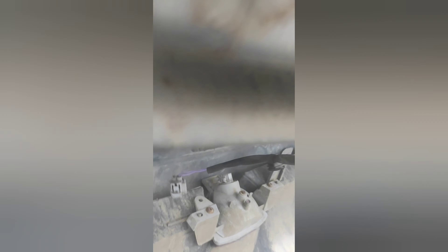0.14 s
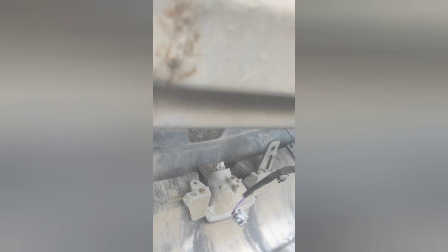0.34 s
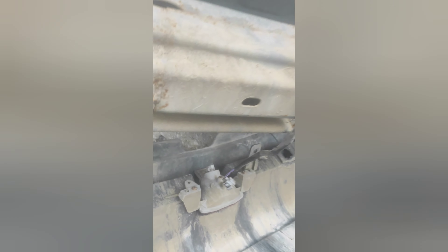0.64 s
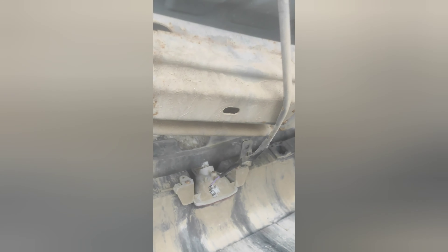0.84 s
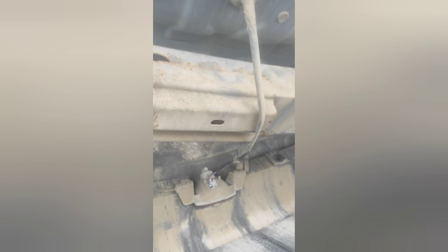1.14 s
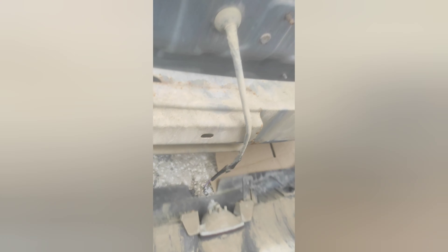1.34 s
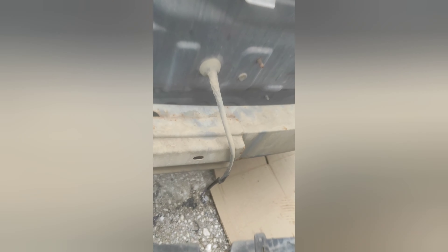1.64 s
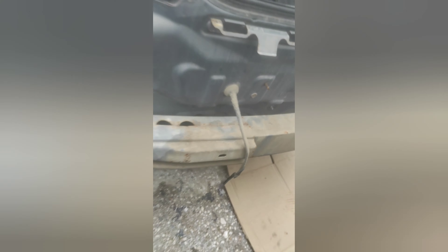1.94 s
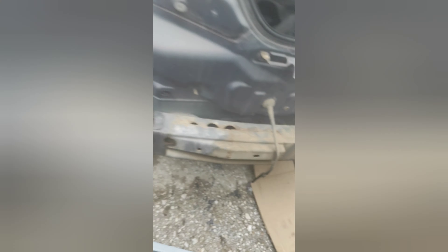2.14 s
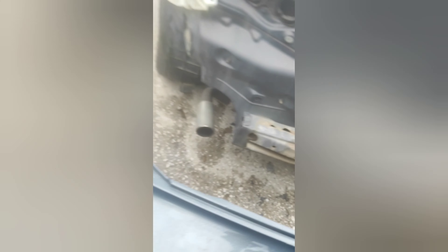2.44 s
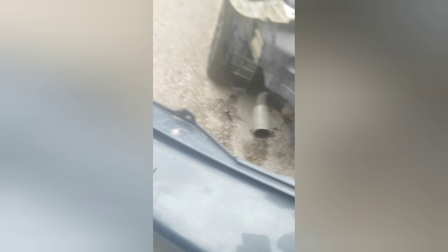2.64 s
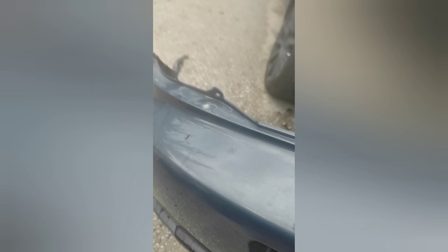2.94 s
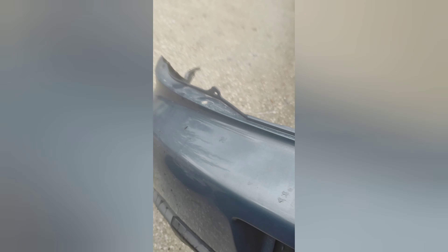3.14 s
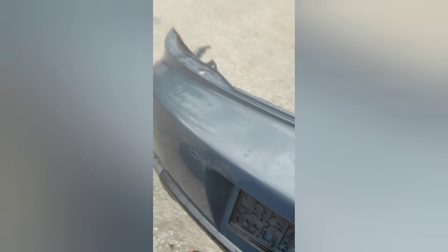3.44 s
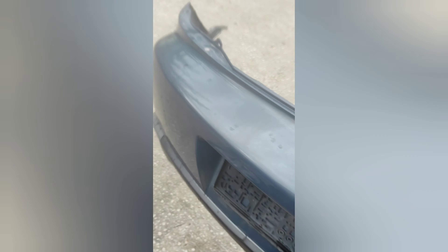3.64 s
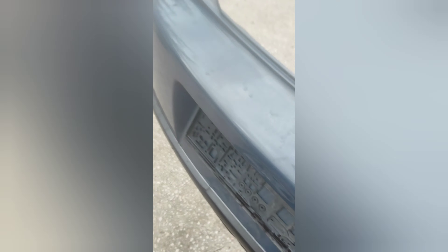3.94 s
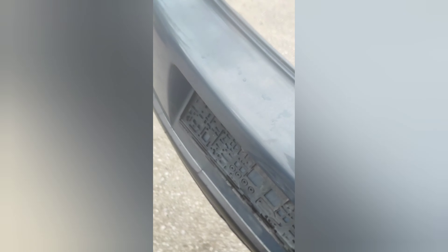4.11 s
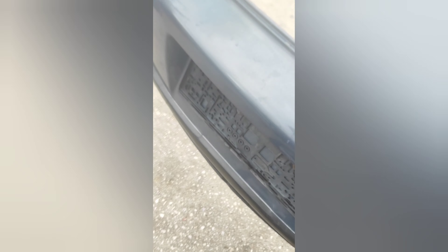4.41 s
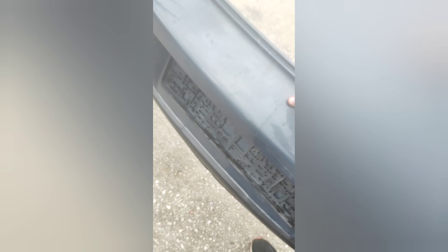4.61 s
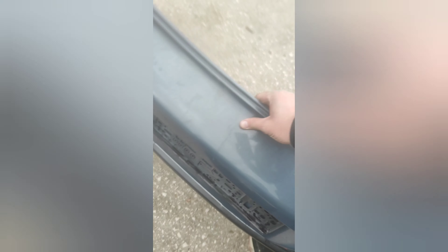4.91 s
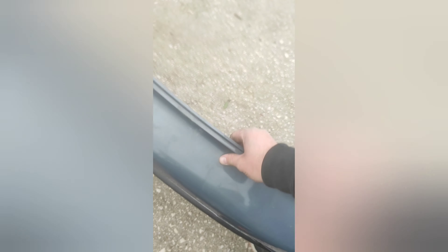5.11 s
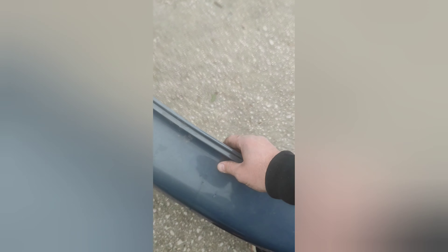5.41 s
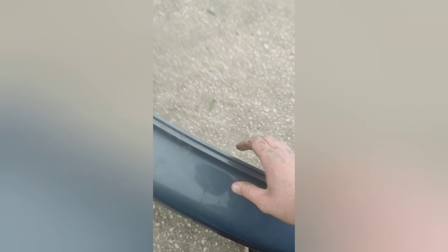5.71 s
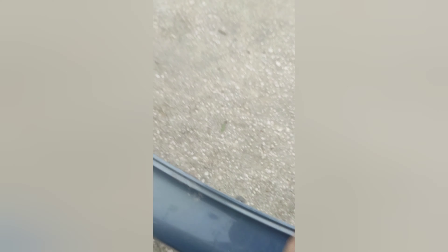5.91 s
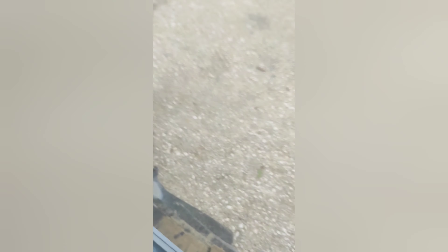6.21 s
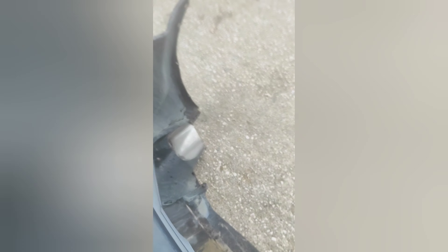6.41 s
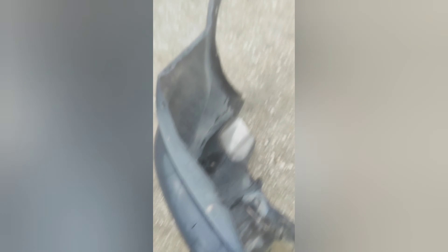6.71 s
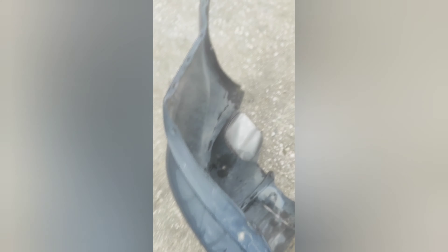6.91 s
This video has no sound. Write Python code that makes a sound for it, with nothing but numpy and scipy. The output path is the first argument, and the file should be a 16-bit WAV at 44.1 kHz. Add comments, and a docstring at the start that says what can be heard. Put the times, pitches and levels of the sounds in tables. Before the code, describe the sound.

Hollow plastic knocks, clip cracks and juddering scrapes come in a dense burst, then sparser thuds and rattles outdoors, with cloth rustling close by.

```python
"""A loose plastic bumper cover is worked off a car over a quiet, low-rumbling yard, a jacket rustling close by.
First, up to 2.3 s, clips snap, struck shell modes thud, and slip trains scrape and judder along the body. Then
it is carried a few steps, with small hollow taps, and gripped again: thuds at 3.5 s, rattles from 4.7 s. Cloth
is shaped noise that swells with each arm swing; the yard is shaped noise whose rumble slowly rises and sinks,
the air wavering a little. At the end a faint far-off whir, a narrow wavering noise band, rises at 6.1 s."""
import sys
import numpy as np
from scipy import signal
from scipy.fft import rfft, irfft, next_fast_len
from scipy.io import wavfile
from scipy.ndimage import uniform_filter1d

SR = 44100
rng = np.random.default_rng(int(sys.argv[2]) if len(sys.argv) > 2 else 0)


def to_wav(sig):
    """Store sig (one row per channel, or 1-D mono) as 16-bit WAV at the path in sys.argv[1].

    Samples outside -1..1 are clipped; the rate is SR.
    """
    pcm = np.clip(np.atleast_2d(sig), -1, 1) * 32767
    pcm = np.round(pcm).astype(np.int16)
    wavfile.write(sys.argv[1], SR, pcm.T)  # frames by channels


N = 311346

# Levels in the event tables are before each function's trims; spectra and modes are relative.
# Yard rumble level. Each row: time in seconds, level in dB.
YARD_LEVEL_DB = [(0, -44), (2.3, -45.5), (2.7, -53), (3.6, -44), (4.3, -48.5), (4.8, -45), (6.2, -48.5),
                 (7.06, -42.5)]
# Rumble spectrum. Each row: frequency in Hz, density in dB per Hz.
RUMBLE_SPECTRUM_DB = [(12, -22), (30, 7.5), (37, -6.5), (45, 14), (58, -2.5), (80, -2), (110, -9.5),
                      (200, -57)]
# Open-air spectrum. Each row: frequency in Hz, density in dB per Hz.
AIR_SPECTRUM_DB = [(60, -35), (120, 5), (210, 5), (400, -2.5), (750, -6), (1050, -1), (1500, -8.5),
                   (2200, -9), (4000, -31)]
# Far-off whir. Each row: time in seconds, centre in Hz, level in dB.
WHIR_TRACK = [(6.1, 1395, -76), (6.27, 1390, -56), (6.68, 1480, -52), (7.06, 1470, -58)]
# Arm swings sliding the jacket cloth. Each row: fastest slide in seconds, length in seconds, level in dB.
ARM_SWINGS = [(0.142, 0.57, -45), (0.612, 0.54, -40.5), (1.31, 0.75, -37), (1.953, 0.78, -43),
              (2.412, 0.79, -42), (2.734, 0.18, -45), (3.529, 0.7, -47.5), (3.885, 0.26, -42.5),
              (4.08, 0.42, -49.5), (4.555, 0.7, -48.5), (5.134, 0.31, -42), (5.442, 0.13, -49.5),
              (5.804, 0.51, -47.5), (6.218, 0.44, -47.5), (6.59, 1, -52.5), (6.95, 0.28, -44)]
# Cloth spectrum. Each row: frequency in Hz, density in dB per Hz.
CLOTH_SPECTRUM_DB = [(120, -33), (200, 0), (227, -5.5), (288, -1.5), (422, -5), (555, -5.5), (1050, -8.5),
                     (1660, -10.5), (3250, -12), (3630, -17), (7390, -5.5), (8240, -7), (10100, -27),
                     (15600, -34)]
# Small hollow taps during the carry. Each row: start in seconds, level in dB, centre in Hz.
TAP_EVENTS = [(2.133, -41.5, 700), (4.336, -47, 980), (4.455, -36.5, 890), (4.475, -40.5, 1050),
              (5.533, -43, 550), (5.849, -34.5, 680), (6.922, -35.5, 950)]
# Drags over the car body. Each row: hardest bearing in seconds, build-up in seconds, let-go in seconds,
# shell level in dB, panel level in dB, rasp level in dB.
DRAG_EVENTS = [(0.018, 0.26, 0.18, -32, -38.5, -38), (0.546, 0.087, 0.1, -28, -25.5, -29.5),
               (0.668, 0.032, 0.034, -24.5, -24.5, -52), (0.745, 0.072, 0.21, -33.5, -31, -31.5),
               (0.91, 0.065, 0.078, -31, -34.5, -39), (1.06, 0.14, 0.084, -31, -31, -34.5),
               (1.175, 0.11, 0.14, -31, -25.5, -35), (1.255, 0.16, 0.32, -25, -26.5, -22),
               (1.345, 0.13, 0.12, -36, -18, -16), (1.413, 0.068, 0.069, -21.5, -19, -25),
               (1.49, 0.15, 0.23, -27, -25.5, -27.5), (1.59, 0.73, 0.13, -26, -34, -33),
               (1.871, 0.21, 0.12, -34.5, -38.5, -38), (3.575, 0.15, 0.14, -29.5, -34, -32.5),
               (3.705, 0.086, 0.17, -37, -42.5, -41), (4.775, 0.076, 0.043, -32.5, -38, -32.5),
               (4.87, 0.086, 0.2, -28, -33.5, -35.5), (5.061, 0.0099, 0.068, -25, -30, -22.5),
               (5.12, 0.13, 0.18, -39.5, -38.5, -37.5), (5.35, 0.076, 0.072, -45.5, -46.5, -48.5),
               (5.48, 0.079, 0.14, -40, -46.5, -56), (6.945, 0.032, 0.11, -53, -39.5, -44)]
# Steady stick-slip of the edge. Each row: start in seconds, end in seconds, slips per second,
# level in dB, roughness from 0 to 1.
JUDDER_EVENTS = [(0.497, 0.585, 416, -20, 0.53), (1.536, 1.58, 239, -11, 0), (2.003, 2.036, 427, -31, 0),
                 (5.053, 5.089, 243, -15.5, 0.2)]
# Blows. Each row: start in seconds, panel knock in dB, shell thud in dB, clip crack in dB,
# frequency in Hz at which the shell flexes most.
BLOW_EVENTS = [(0.128, -24, -20, -35.5, 235), (0.141, -34, -24, -48, 193), (0.159, -43, -22, -59, 146),
               (0.199, -19, -17, -14, 362), (0.615, -38, -17.5, -42, 268), (0.628, -19, -22, -56, 370),
               (0.712, -24.5, -27.5, -55, 366), (0.782, -22, -13.5, -33.5, 330),
               (0.792, -33, -13.5, -32, 230), (0.806, -35.5, -21, -55, 200), (0.853, -56, -24.5, -63, 257),
               (0.872, -24.5, -28, -35, 222), (0.968, -25, -40, -40, 453), (1.012, -30, -18, -35.5, 226),
               (1.096, -16, -15.5, -26.5, 287), (1.238, -38, -19, -29.5, 242),
               (1.332, -17, -13, -40.5, 256), (1.348, -29, -15.5, -20, 494), (1.362, -13.5, -22, -32, 440),
               (1.376, -20.5, -15, -41, 266), (1.438, -43, -26.5, -53, 242), (1.483, -39, -37, -28, 248),
               (1.548, -17, -13, -39, 248), (1.579, -24, -20.5, -38, 480), (1.784, -40, -23, -38, 226),
               (1.797, -28, -16.5, -29.5, 265), (1.857, -50, -27, -58, 218), (2.005, -39, -27.5, -50, 270),
               (2.265, -27.5, -38.5, -36, 403), (2.299, -32, -36.5, -52.5, 344),
               (2.739, -44, -36, -60, 272), (3.463, -38, -30, -55, 152), (3.521, -47, -20, -63, 151),
               (3.5501, -18.5, -10.5, -30.5, 300), (3.5606, -19.5, -10.5, -34, 303),
               (3.5755, -30, -10.5, -50, 274), (3.583, -41, -13, -55, 267), (3.618, -30, -20, -35, 292),
               (3.643, -32.5, -21.5, -43, 283), (3.671, -30.5, -32, -41.5, 336),
               (3.704, -34, -30, -48, 300), (3.775, -35.5, -24, -44.5, 302), (3.989, -38, -33, -47, 367),
               (4.021, -41, -32.5, -58, 283), (4.721, -22.5, -19.5, -40.5, 266),
               (4.727, -28, -16.5, -67, 396), (4.759, -34, -22, -35.5, 188), (4.82, -31.5, -31, -39, 302),
               (4.831, -27, -20, -38, 306), (4.852, -37, -22.5, -32.5, 198), (4.869, -19, -33, -26.5, 190),
               (4.9, -30, -47, -32.5, 213), (4.928, -31, -30, -48, 199), (4.965, -34, -25, -49, 230),
               (5.046, -39, -20.5, -28, 302), (5.052, -19.5, -29, -26, 253), (5.094, -33, -24, -46, 254),
               (5.117, -37, -34, -33.5, 190), (5.259, -40.5, -53, -68, 303),
               (5.435, -34.5, -36, -54.5, 280), (6.077, -42.5, -54, -45.5, 300),
               (7.028, -39, -45, -47, 246)]
# Broad flexing modes of the shell. Each row: frequency in Hz, level in dB, t60 in seconds (ungripped).
SHELL_MODES = [(103, 10.5, 0.086), (157.8, 0, 0.45), (191, 5, 0.12), (214.5, 2.5, 0.11), (244, 3, 0.1),
               (287.3, 1, 0.085), (345.8, -1, 0.093), (371.6, -2, 0.14), (417, 3.5, 0.084),
               (463, 2.5, 0.062)]
# Strongest panel modes. Each row: frequency in Hz, level in dB, t60 in seconds (before hand damping).
PANEL_STRONG_MODES = [(615, 3, 0.053), (670, 2.5, 0.036), (796.6, 2.5, 0.041), (937, 0.5, 0.029),
                      (1091, -1.5, 0.042), (1322, -4.5, 0.055), (1730, -15.5, 0.12)]
# Stiff rim that holds the clips. Each row: frequency in Hz, level in dB, t60 in seconds.
RIM_MODES = [(1483, 14.5, 0.031), (1627, 8.5, 0.045), (1910, 12.5, 0.038), (2195, 12.5, 0.042),
             (2573, 15, 0.027), (2788, 10, 0.057), (3220, -5, 0.05), (4700, -6, 0.06)]
# Dense higher modes of panel, clips and edge. Each row: frequency in Hz, level in dB.
PANEL_SPECTRUM_DB = [(350, -22.5), (480, 5), (620, -3), (800, -0.5), (1100, 2), (1400, -9.5), (1900, -10.5),
                     (3000, -104)]
CLIP_SPECTRUM_DB = [(900, -22), (1400, 2.5), (1750, -2.5), (2300, 0), (2750, -5.5), (3300, -6),
                    (4400, -12.5), (6000, -40)]
EDGE_SPECTRUM_DB = [(2500, -58), (4000, -9), (5500, -5), (7200, 1.5), (8300, -4), (9700, -21), (15000, -45)]
# Judder rasp and outdoor scatter. Each row: frequency in Hz, level in dB.
JUDDER_SPECTRUM_DB = [(200, -32), (500, -6), (950, 8), (1200, 3.5), (1600, -34.5), (3000, -39), (12000, -43)]
SCATTER_SPECTRUM_DB = [(100, 11.5), (1500, 7.5), (6000, 9.5), (15000, -51)]
# Contact softness dulls the knock. Each row: crack minus knock in dB, low-pass corner in Hz.
KNOCK_CORNER_HZ = [(-26, 1080), (-17, 520), (-21, 4000)]
# Harder snaps reach higher rim modes. Each row: crack in dB, frequency in Hz where the drive halves.
RIM_REACH_HZ = [(-25, 2200), (-13, 5100)]
# Place of the cover. Each row: time in seconds, left minus right in dB.
COVER_SIDE_DB = [(0, -1.5), (0.9, -2), (1.6, -0.5), (3.5, 0.5)]
# Likeness of the two microphone ports. Each row: frequency in Hz, left-right coherence.
PORT_COHERENCE = [(40, 1), (300, 0.77), (640, 0.24), (1400, 0.018), (3000, 0.026), (15000, 0.13)]
# Colour difference of the ports. Each row: frequency in Hz, left minus right in dB.
PORT_LEAN_DB = [(40, 6.5), (150, 6.5), (280, 4), (600, 4.5), (1300, 4), (2800, 0), (5500, -1.5),
                (7200, -0.5), (9000, 2.5), (14000, 0)]

RING_S = np.arange(8192) / SR
CUT_HZ = 15650
SLEEVE_REST_DB = -59  # cloth is never quite still
GRIP_T60_S = 0.22  # extra fade: holding hands damp the shell
DRAG_SPAN_DB, DRAG_ROUNDING = 20, 1.3  # drop at one build-up or let-go; above 1 lingers near the peak
# the edge ticks at most TOP, and fades faster than the crack below FULL
TICK_TOP_DB, TICK_SLOPE, TICK_FULL_DB = -22.5, 1.43, -24.5


def amp(db):
    """Decibels to gain."""
    return 10 ** (np.asarray(db) / 20)


def unit(x):
    """Scales to rms 1."""
    return x / np.sqrt(np.mean(x ** 2) + 1e-20)


def struck(x, size=512):
    """Scales a pair so that its channel mean has rms 1 at its loudest moment."""
    return x / np.sqrt(uniform_filter1d(x.mean(0) ** 2, size).max() + 1e-20)


def read(points, hz):
    """Reads a spectrum on a log-frequency axis."""
    f, value = np.transpose(points)
    return np.interp(np.log(hz + 1), np.log(f + 1), value)


def follow(rows, t_s):
    """Columns of a curve table at times t_s."""
    s, *columns = np.transpose(rows)
    return [np.interp(t_s, s, column) for column in columns]


def add(mix, start_s, sound):
    """Mixes a pair in at start_s."""
    part = mix[:, max(round(start_s * SR), 0):][:, :sound.shape[1]]
    part += sound[:, :part.shape[1]]


def ports(hz):
    """Random complex weights for two microphone ports with the tabled coherence."""
    a, b, c, d = rng.standard_normal((4, len(hz)))
    same = np.clip(read(PORT_COHERENCE, hz), -1, 1)
    left = a + 1j * b
    right = same * left + np.sqrt(1 - same ** 2) * (c + 1j * d)
    return np.array([left, right])


def noise(spectrum_db, size):
    """A noise pair of the given spectrum, rms 1."""
    fft_size = next_fast_len(size)
    hz = np.fft.rfftfreq(fft_size, 1 / SR)
    return unit(irfft(ports(hz) * amp(read(spectrum_db, hz)), fft_size)[:, :size])


def drift(rate_hz, size):
    """Random values of rms about 1, drawn rate_hz times a second and joined by lines."""
    at = np.arange(size) * rate_hz / SR
    return np.interp(at, np.arange(4096), rng.standard_normal(4096)) * np.sqrt(3 / 2)


def grains(per_s, spread_db, size, clump_db=6, clumps_hz=70):
    """A random train of tiny slips that come in clumps, a few of them large."""
    clumps = amp(clump_db * drift(clumps_hz, size))
    sizes = amp(spread_db * np.minimum(rng.exponential(1, size), 4))
    signs = rng.choice([-1, 1], size)
    slips = rng.random(size) < per_s / SR * clumps / clumps.mean()
    return sizes * signs * slips


def through(drive, body):
    """A force rings a body: convolution with its ring."""
    return signal.fftconvolve(drive[None], body, axes=1)[:, :len(drive)]


def dulled(x, corner_hz):
    """Third-order low-pass."""
    return signal.lfilter(*signal.butter(3, min(corner_hz, SR / 3), fs=SR), x)


def modes(table, emphasis=1., rise_s=.0004, scatter_rad=np.pi):
    """Decaying modes with scattered start phases, each a little out of step between the ports."""
    hz, db, t60_s = np.transpose(table)
    phase = scatter_rad * rng.standard_normal(len(hz)) + 0.38 * rng.standard_normal((2, len(hz)))
    rings = np.exp(2j * np.pi * hz[:, None] * RING_S) * amp(-60 * RING_S / t60_s[:, None])
    weights = emphasis * amp(db) * np.exp(1j * phase)
    return (weights @ rings).real * (1 - np.exp(-RING_S / rise_s))


def dense_ring(spectrum_db, t60_s, hold_s=0., rise_s=0.00012):
    """Countless overlapping modes, as noise, swell, are kept up by chatter for hold_s, and die."""
    fade = amp(-60 * np.maximum(RING_S - hold_s, 0) / t60_s)
    return noise(spectrum_db, len(RING_S)) * fade * (1 - np.exp(-RING_S / rise_s))


def yard(air_db=-50):
    """A low rumble and the soft wash of open air, both shaped noise."""
    rumble_db, = follow(YARD_LEVEL_DB, np.arange(N) / SR)
    waver_db = drift(25, N)
    return amp(rumble_db) * noise(RUMBLE_SPECTRUM_DB, N) + amp(air_db + waver_db) * noise(AIR_SPECTRUM_DB, N)


def whir(half_width_hz=85, waver_hz=25):
    """Low-passed noise shifted up to a wavering centre makes a narrow, distant band."""
    hz, db = follow(WHIR_TRACK, np.arange(N) / SR)
    carrier = np.exp(2j * np.pi * np.cumsum(hz + waver_hz * drift(18, N)) / SR)
    fuzz = signal.lfilter(*signal.butter(2, half_width_hz, fs=SR), ports(np.full(N, hz.mean())))
    return amp(db) * unit((fuzz * carrier).real)


def jacket(cloth_db=2, flutter_db=1.5, ends_db=15.0):
    """Cloth friction hisses with each arm swing, swelling and fading evenly, fluttering over its folds."""
    s, length_s, db = np.transpose(ARM_SWINGS)[:, :, None]
    off_peak = 2 * (np.arange(N) / SR - s) / length_s
    swings = amp(db - ends_db * np.minimum(off_peak ** 2, 20))
    level = np.sqrt((swings ** 2).sum(0) + amp(SLEEVE_REST_DB) ** 2)
    return level * amp(cloth_db + flutter_db * drift(70, N)) * noise(CLOTH_SPECTRUM_DB, N)


def surroundings(x, wet_db=-21, t60_s=0.14):
    """Faint scatter from the ground and the car: a decaying noise tail after 6 ms."""
    t_s = np.arange(SR // 2) / SR
    tail = noise(SCATTER_SPECTRUM_DB, len(t_s)) * amp(-60 * t_s / t60_s) * (t_s > .006)
    return x + amp(wet_db) * signal.fftconvolve(x, tail / np.linalg.norm(tail[0]), axes=1)[:, :N]


def taps(t60_s=0.042, skirt_db_per_octave=-15):
    """Light contacts ring one narrow, hollow band."""
    out = np.zeros((2, N))
    octaves = np.arange(-2, 3)
    for s, db, hz in TAP_EVENTS:
        spectrum_db = np.column_stack([hz * 2. ** octaves, skirt_db_per_octave * abs(octaves)])
        ring = dense_ring(spectrum_db, t60_s, rise_s=0.00068)
        add(out, s, amp(db) * struck(dulled(ring, 2 * hz)))
    return out


def shell(flex_hz, reach_octaves):
    """The contact point drives the shell modes near flex_hz most, nearly in step."""
    octaves = np.log2(np.transpose(SHELL_MODES)[0] / flex_hz)
    emphasis = 1 / (1 + (octaves / reach_octaves) ** 2)
    return modes(SHELL_MODES, emphasis, rise_s=0.0027, scatter_rad=0.71)


def panel(t60_s, hold_s=0., rise_s=0.00025, modes_db=0):
    """A few strong modes stand out of many weak ones; a hand damps both when t60_s is short."""
    hand = amp(-60 * RING_S * max(1 / t60_s - 1 / .05, 0))
    weak = struck(dense_ring(PANEL_SPECTRUM_DB, t60_s, hold_s, rise_s))
    strong = struck(modes(PANEL_STRONG_MODES, rise_s=rise_s) * hand)
    return weak + amp(modes_db) * strong


def rim(reach_hz, rise_s=0.00044):
    """The stiff rim's modes, driven ever less above reach_hz."""
    emphasis = 1 / (1 + (np.transpose(RIM_MODES)[0] / reach_hz) ** 4)
    return struck(modes(RIM_MODES, emphasis, rise_s))


def judders(jitter=0.025, kick=0.088):
    """Regular stick-slip: the shell swings at the slip rate and each release rasps the panel."""
    out = np.zeros((2, N))
    for start_s, end_s, slip_hz, db, rough in JUDDER_EVENTS:
        size = max(round((end_s - start_s) * SR), 64)
        turns = np.cumsum(slip_hz * (1 + jitter * drift(223, size))) / SR
        swing = unit(np.sin(2 * np.pi * turns))
        releases = (kick + rng.standard_normal(size)) * np.exp(-(turns % 1) / 0.061)
        rasp = unit(through(releases, dense_ring(JUDDER_SPECTRUM_DB, t60_s=0.029)))
        grip = amp(1.5 * drift(200, size)) * signal.windows.tukey(size, .65)
        add(out, start_s, amp(db) * (swing + rough * rasp) * grip)
    return out


def bearing(t_s):
    """Drive of shell, panel and rasp in dB: each drag builds up, then lets go; the strongest wins."""
    s, build_s, let_go_s, *levels_db = np.transpose(DRAG_EVENTS)[:, :, None]
    coarse_s = t_s[::64]
    off_peak = np.maximum((s - coarse_s) / build_s, (coarse_s - s) / let_go_s)
    slack_db = DRAG_SPAN_DB * np.clip(off_peak, 0, 10) ** DRAG_ROUNDING
    return [np.interp(t_s, coarse_s, (db - slack_db).max(0)) for db in levels_db]


def scrape(body, per_s, spread_db, count=3):
    """Slips at a few contact points of varying load, each ringing the body in its own way."""
    loads = [amp(4 * drift(35, N)) for _ in range(count)]
    sound = sum(through(load * grains(per_s, spread_db, N), body()) for load in loads)
    power = uniform_filter1d((sound ** 2).mean(0), size=3500)
    return sound / np.sqrt(power + 1e-20)  # the total load is steady


def drags(flex_db=1.5, panel_db=-2.0, clip_db=-9, edge_db=-17, rim_db=-3):
    """Slips over the car body shake the shell, ring the panel and rasp along the rim and edge."""
    def clip_and_rim():
        return struck(dense_ring(CLIP_SPECTRUM_DB, t60_s=0.074)) + amp(rim_db) * rim(1750)

    shell_db, mid_db, rasp_db = bearing(np.arange(N) / SR)
    sound = amp(shell_db + flex_db) * scrape(
        lambda: shell(297, reach_octaves=0.56), per_s=260, spread_db=1.0)
    sound += amp(mid_db + panel_db) * scrape(
        lambda: panel(t60_s=0.05, modes_db=3), per_s=115, spread_db=1.8)
    sound += amp(rasp_db + clip_db) * scrape(clip_and_rim, per_s=140, spread_db=1.0)
    sound += amp(rasp_db + edge_db) * scrape(
        lambda: dense_ring(EDGE_SPECTRUM_DB, t60_s=0.023), per_s=400, spread_db=1.5)
    return sound


def blows(knock_db=-4, thud_db=-2, crack_db=-5, rim_db=-5.5, tick_db=-5.0, chatter_s=0.0067):
    """Each blow flexes the shell, knocks the panel, cracks a clip on the rim and ticks the edge."""
    out = np.zeros((2, N))
    for s, knock, thud, crack, flex_hz in BLOW_EVENTS:
        # a hard snap starts faster and rings longer
        rise_s = np.interp(crack, [-35, -15], [.0018, .0012])
        t60_s = np.interp(crack, [-40, -18], [.04, .058])
        # a blow that hardly moves the shell is short and dry
        weight = np.interp(thud, [-38, -26], [.5, 1])
        tick = TICK_TOP_DB + TICK_SLOPE * min(crack - TICK_FULL_DB, 0)
        corner_hz = np.interp(crack - knock, *np.transpose(KNOCK_CORNER_HZ))
        reach_hz = np.interp(crack, *np.transpose(RIM_REACH_HZ))

        flex = shell(flex_hz, reach_octaves=0.23) * amp(-60 * RING_S / GRIP_T60_S)
        ring = panel(t60_s=0.068 * weight, hold_s=chatter_s * weight, rise_s=rise_s * weight)
        clip = dense_ring(CLIP_SPECTRUM_DB, t60_s * weight, hold_s=chatter_s / 2, rise_s=rise_s)
        edge = dense_ring(EDGE_SPECTRUM_DB, t60_s, hold_s=chatter_s / 2, rise_s=2 * rise_s)

        sound = amp(thud + thud_db) * struck(flex)
        sound += amp(knock + knock_db) * struck(dulled(ring, corner_hz))
        sound += amp(crack + crack_db) * struck(clip)
        sound += amp(crack + rim_db) * rim(reach_hz, rise_s)
        sound += amp(tick + tick_db) * struck(edge)
        add(out, s, sound)
    return out


def scene():
    """The yard, the whir, the jacket and the bumper cover, which moves from right to left."""
    side_db, = follow(COVER_SIDE_DB, np.arange(N) / SR)
    cover = (taps() + judders() + drags() + blows()) * amp(np.array([side_db, -side_db]) / 2)
    return yard() + whir() + jacket() + surroundings(cover)


def record(dry):
    """Two microphone ports differ in colour and saturate gently; then the band limit."""
    size = next_fast_len(N)
    lean_db = read(PORT_LEAN_DB, np.fft.rfftfreq(size, 1 / SR))
    heard = irfft(rfft(dry, size) * amp(np.array([lean_db, -lean_db]) / 2), size)[:, :N]
    heard = np.tanh(heard)  # rounds off the hardest snaps
    low_pass = signal.firwin(511, CUT_HZ, window=("kaiser", 9), fs=SR)
    return signal.oaconvolve(heard, low_pass[None], "same")


dry = scene()
out = record(dry)
to_wav(out)
```